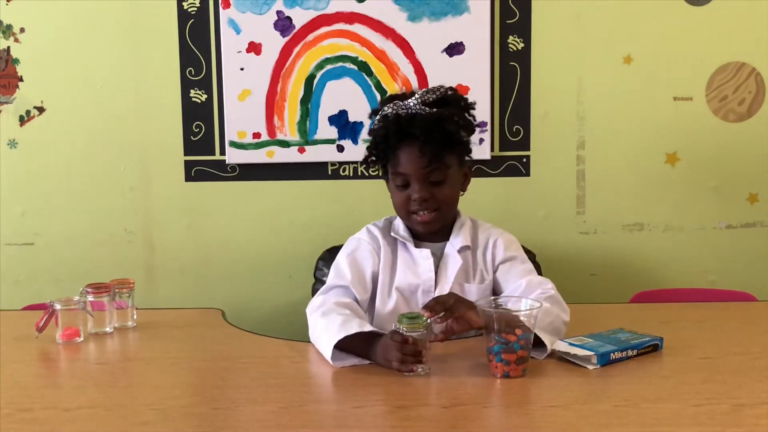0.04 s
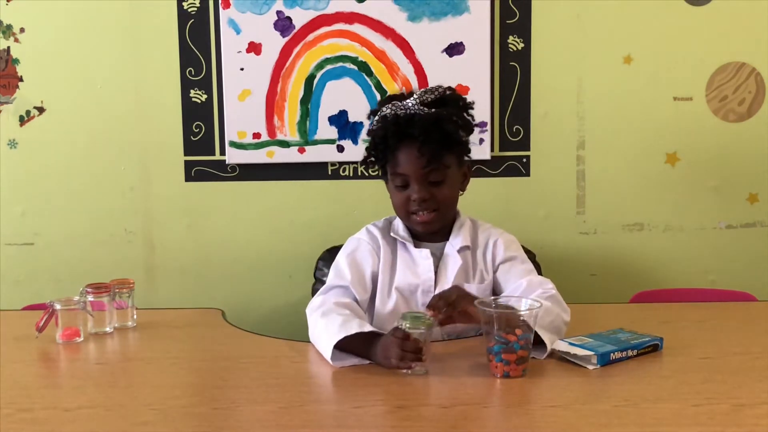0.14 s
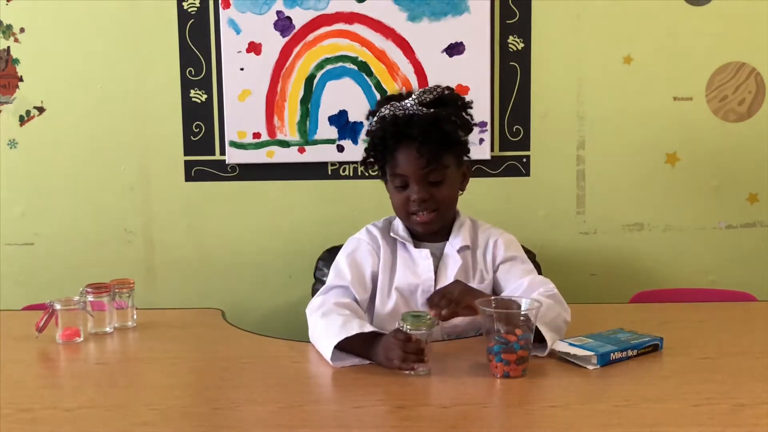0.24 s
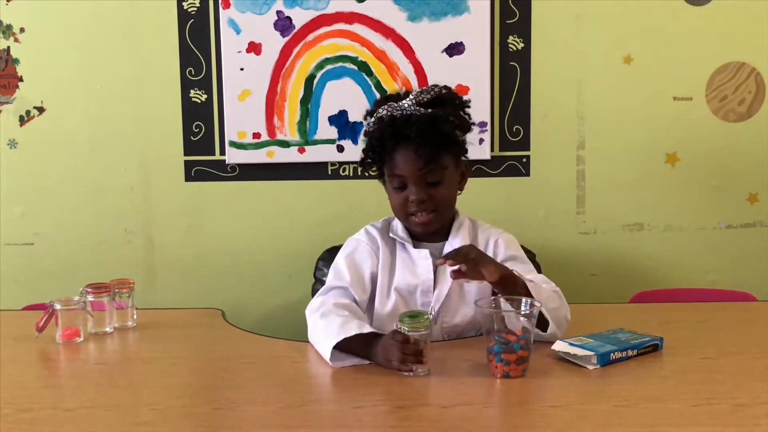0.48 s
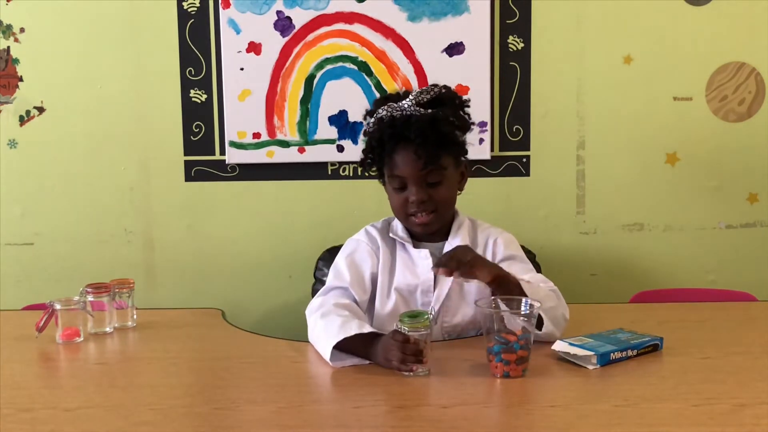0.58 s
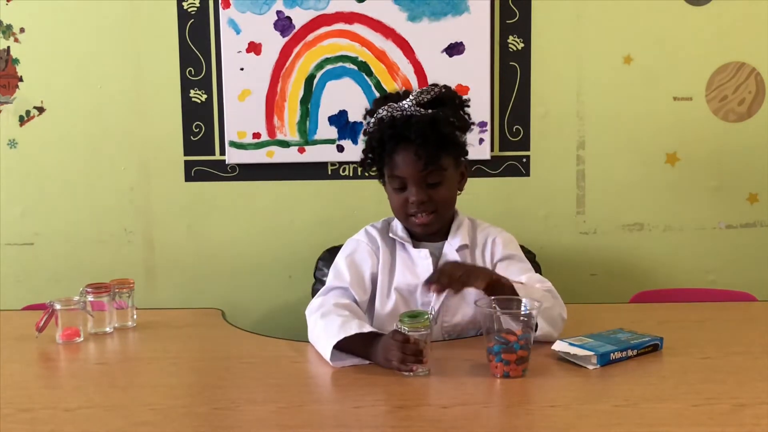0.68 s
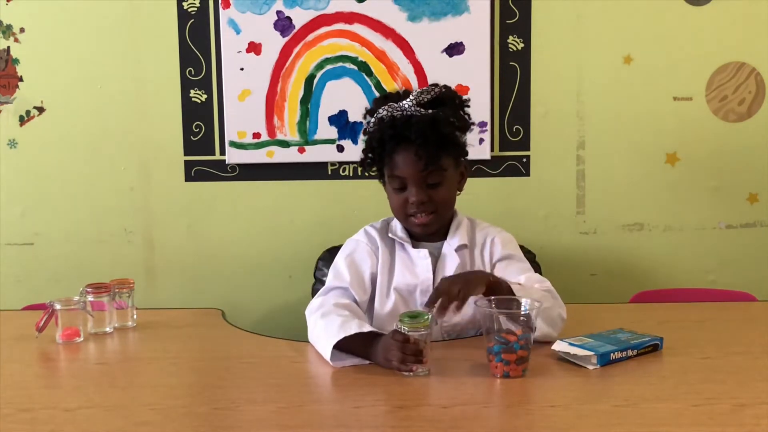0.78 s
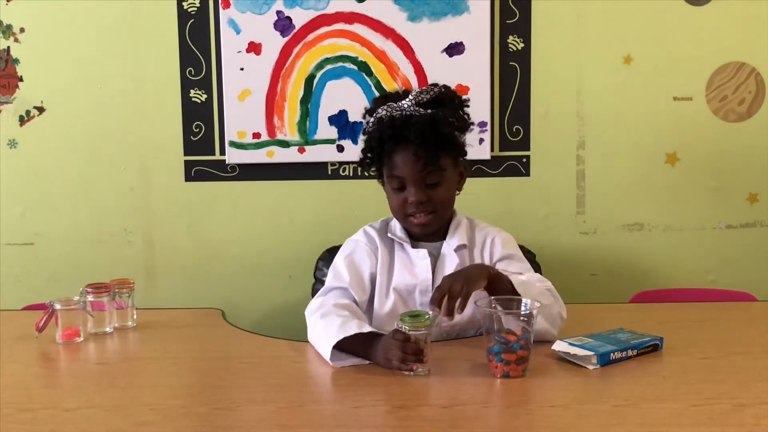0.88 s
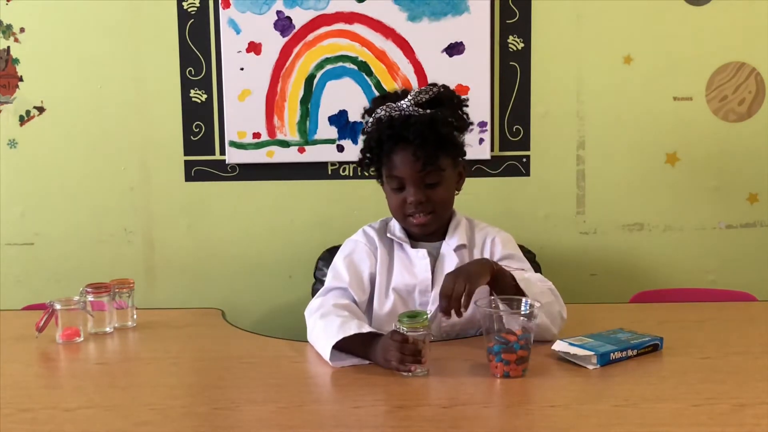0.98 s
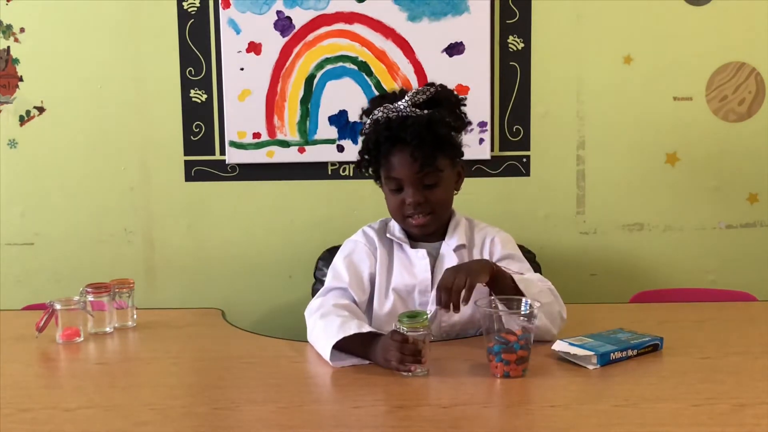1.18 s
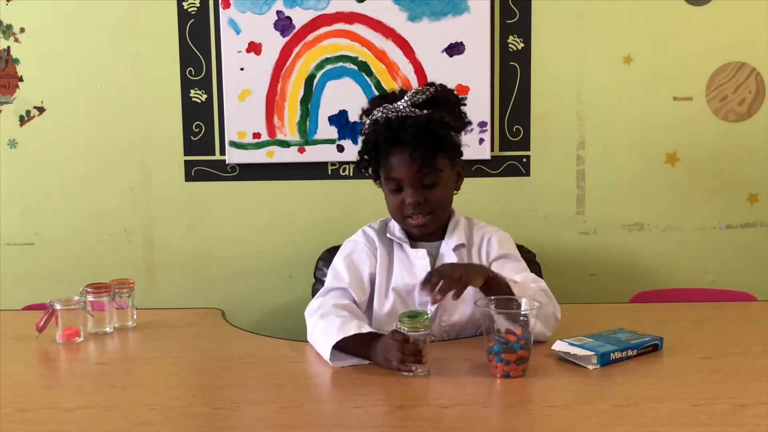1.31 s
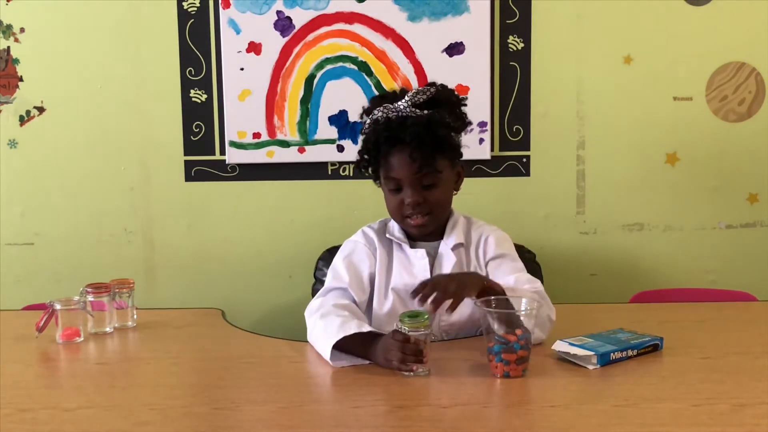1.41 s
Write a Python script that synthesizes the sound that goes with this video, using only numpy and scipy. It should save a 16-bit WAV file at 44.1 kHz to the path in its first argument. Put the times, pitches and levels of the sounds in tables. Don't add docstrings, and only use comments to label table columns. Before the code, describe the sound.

Hard candies knock loudly on a wooden table, then tick on glass and snap brightly

```python
import sys
import numpy as np
from scipy import signal
from scipy.fft import rfft, irfft, next_fast_len
from scipy.io import wavfile
from scipy.ndimage import uniform_filter1d

SR = 44100
rng = np.random.default_rng(int(sys.argv[2]) if len(sys.argv) > 2 else 0)


def to_wav(sig):
    pcm = np.clip(np.atleast_2d(sig), -1, 1) * 32767
    pcm = np.round(pcm).astype(np.int16)
    wavfile.write(sys.argv[1], SR, pcm.T)


def to_linear_factor(level_db):
    exponent = np.asarray(level_db, float) / 20
    return 10 ** exponent


N = 63945


def curve(table, hz):
    table_hz = [row[0] for row in table]
    values = [row[1] for row in table]
    return np.interp(np.log(hz), np.log(table_hz), values)


def bands():
    size = next_fast_len(N)
    hz = np.arange(size // 2 + 1) * SR / size + 1
    spectrum = rfft(rng.standard_normal(size))
    for centre in 25 * 2 ** (np.arange(29) / 3):
        triangle = np.clip(1 - 3 * np.abs(np.log2(hz / centre)), 0, 1)
        yield centre, irfft(spectrum * triangle, size)[:N]


def walk(rate):
    hold = int(SR / rate)
    steps = np.repeat(rng.standard_normal(N // hold + 1), hold)
    return uniform_filter1d(uniform_filter1d(steps, hold), hold)[:N]


def knock(blows, modes):
    scatter_db = 2.5
    out, t = np.zeros(N), np.arange(N) / SR
    modes = np.array(modes)
    hz, mode_db, t60 = modes[:, :1], modes[:, 1], modes[:, 2:]
    sign = (-1) ** np.arange(len(modes))
    chance = rng.standard_normal((len(blows), len(modes)))
    for (at, db, contact_ms), luck in zip(blows, chance):
        start = int(at * SR)
        since = np.clip(t[start:start + SR // 2] - at, 0, None)
        gain = to_linear_factor(db + mode_db + scatter_db * luck) * sign
        ring = np.sin(2 * np.pi * hz * since) * np.exp(-np.log(1000) * since / t60)
        push = np.sin(np.pi * np.clip(since[:200] * 1000 / contact_ms, 0, 1)) ** 2
        push[0] += 1e-3
        out[start:start + len(since)] += np.convolve(gain @ ring, push / push.sum())[:len(since)]
    return out


def burst(events, colour, wet_db):
    t = np.arange(N) / SR
    noise = sum(band * to_linear_factor(curve(colour, centre)) for centre, band in bands())
    envelope, strikes = np.zeros(N), np.zeros(N)
    for at, db, t60_ms in events:
        decay = to_linear_factor(db - 60000 * np.clip(t - at, 0, 1) / t60_ms)
        envelope += decay * np.clip((t - at) * 1e4 / t60_ms, 0, 1)
        strikes[int(at * SR)] = to_linear_factor(db + wet_db) * np.sqrt(t60_ms * SR / 20000)
    near = noise / np.std(noise) * envelope
    click = np.roll(irfft(to_linear_factor(curve(colour, np.arange(1025) * SR / 2048 + 1))), 1024)
    click = click / np.sqrt(np.sum(click ** 2))
    return near, signal.fftconvolve(strikes, click)[1024:1024 + N]


def ventilation():
    # frequency in Hz, level in dB per Hz
    air_colour = [(15, -42), (25, -32.5), (49, -4), (180, -8), (624, -21), (775, -21.5), (1230, -29),
                  (10400, -38), (16000, -43)]
    # frequency in Hz, level in dB
    hum_lines = [(59.2, -62.5), (177.6, -61.5), (355.3, -73.5)]
    t = np.arange(N) / SR
    air = sum(band * to_linear_factor(curve(air_colour, centre) + 0.5 * walk(27)) for centre, band in bands())
    hum = sum(to_linear_factor(db) * np.sqrt(2) * np.sin(2 * np.pi * hz * t) for hz, db in hum_lines)
    return air * to_linear_factor(-48.5) / np.std(air) + hum


def thuds(wet_db):
    # start in seconds, level in dB, t60 in ms
    thud_events = [
        (.1800, -47.5, 120),
        (0.2052, -3.5, 11),
        (0.358, -20.5, 21.6),
        (.8620, -34, 8.3),
        (0.998, -16, 6.2),
    ]
    # frequency in Hz, level in dB
    thud_colour = [(70, -19.5), (200, -8.5), (400, -10.5), (1400, -0.5), (2600, -10), (3800, -18),
                   (8000, -30), (16000, -61)]
    return burst(thud_events, thud_colour, wet_db)


def table_knock():
    # start in seconds, level in dB, contact in ms
    blows = [
        (.2048, -16, 0.76),
        (.2058, -5, 0.36),
        (.2068, -4.5, 0.52),
    ]
    # frequency in Hz, level in dB, t60 in seconds
    modes = [(265, -12.5, 0.026), (307.4, -4, 0.031), (361, -3.5, 0.086), (411, 2, 0.081),
             (510.2, 3.5, 0.078), (600.7, -2, 0.027), (719, -1, 0.079), (863, 2.5, 0.017),
             (1013, -2, 0.032), (1235.5, 4, .03), (1459, 5, 0.052), (1644, 4.5, 0.028), (2258, 8, 0.034),
             (2732, -7, .015)]
    return knock(blows, modes)


def room():
    # frequency in Hz, t60 in seconds
    room_t60 = [(100, 1.15), (300, 0.76), (1000, 0.64), (3000, 0.58), (6000, 0.47), (11000, 0.21),
                (16000, 0.37)]
    # frequency in Hz, level in dB
    room_colour = [(100, -1), (300, 7.5), (1000, -2), (3000, -6), (6000, 2.5), (16000, 6)]
    rise_s, fade_db = 0.0065, 10
    t = np.arange(N) / SR
    tail = np.zeros(N)
    for centre, band in bands():
        t60 = curve(room_t60, centre)
        tail += band * to_linear_factor(curve(room_colour, centre) - 60 * t / t60) / np.sqrt(t60)
    tail *= to_linear_factor(-fade_db * (t / 0.32) ** 2)
    tail *= 1 - np.exp(-(t / rise_s) ** 2)
    return tail / np.sqrt(np.sum(tail ** 2))


def cracks(wet_db):
    # start in seconds, level in dB, t60 in ms
    crack_events = [
        (0.2052, -17.5, 16.5),
        (.3590, -43, 6.3),
        (.3850, -63, 3.5),
        (0.396, -40.5, 5.7),
        (.8590, -52, 2.5),
        (0.868, -45, 5.9),
        (.8985, -50, 1.9),
        (.9535, -26.5, 3.2),
    ]
    # frequency in Hz, level in dB
    crack_colour = [(500, -34.5), (2000, -10.5), (4000, -4), (6000, -10.5), (8000, -8.5), (12000, 4),
                    (16000, -29.5)]
    return burst(crack_events, crack_colour, wet_db)


def candy_ticks():
    # start in seconds, level in dB, contact in ms
    blows = [
        (.2058, -11.5, 0.073),
        (.3850, -44, 0.032),
        (.8590, -45.5, .05),
        (.8660, -45, 0.16),
        (.8985, -45, 0.06),
        (.9535, -26, 0.097),
    ]
    # frequency in Hz, level in dB, t60 in seconds
    modes = [(3600, -8, .006), (5400, -6, .008), (6150, 0, .014), (9400, -8, .006), (11500, -3, .01),
             (15300, -6, .005)]
    return knock(blows, modes)


def table_board():
    # start in seconds, level in dB, contact in ms
    blows = [
        (.2090, -22.5, 3),
        (.2200, -17, 3.5),
    ]
    # frequency in Hz, level in dB, t60 in seconds
    modes = [(101, -9.5, .2), (131.3, 1.5, 0.34), (183, -6.5, 0.13)]
    return knock(blows, modes)


def bounce():
    # start in seconds, level in dB, contact in ms
    blows = [
        (.3572, -24, 0.39),
        (.3595, -27.5, 0.86),
        (.3620, -19, 0.32),
    ]
    # frequency in Hz, level in dB, t60 in seconds
    modes = [(420, -5.5, 0.039), (618, 5.5, 0.027), (1007, 10.5, 0.014), (1190, 2.5, 0.095),
             (1578, 0, 0.034), (2617, 1, 0.032)]
    return knock(blows, modes)


def glass_jar():
    # start in seconds, level in dB, contact in ms
    blows = [
        (.8575, -48, 0.078),
        (.8655, -36.5, 0.19),
        (.8980, -43, 0.075),
        (.9535, -31, .05),
        (1.0250, -23, 0.12),
    ]
    # frequency in Hz, level in dB, t60 in seconds
    modes = [(2283, -13, 0.036), (3397, -24, .02), (4080, -5.5, 0.034), (5700, -15.5, .025),
             (6790, -1, 0.052), (11200, -19.5, 0.019)]
    return knock(blows, modes)


def jar_air():
    # start in seconds, level in dB, contact in ms
    blows = [
        (.8575, -40, 0.83),
        (.8700, -35.5, 1),
        (.8800, -38, 0.85),
        (.9050, -46, 0.34),
        (.9460, -53, 0.38),
        (.9540, -37.5, 0.27),
        (.9660, -29.5, 0.96),
    ]
    # frequency in Hz, level in dB, t60 in seconds
    modes = [(524.5, 5.5, 0.052), (597, 5, 0.031), (695, 7, 0.052), (783, 9, 0.028), (1210, -7.5, 0.032)]
    return knock(blows, modes)


def plastic_cup():
    # start in seconds, level in dB, contact in ms
    blows = [
        (.9936, -22.5, 0.14),
        (.9964, -16.5, 0.21),
    ]
    # frequency in Hz, level in dB, t60 in seconds
    modes = [(230, -18, .03), (418, -5, .05), (530, -7, .04), (776, 4, .075), (1000, -11, .03),
             (1192, 5, .085), (1600, -6, .05), (2078, -14, .02), (2580, -8, .012), (3400, -14, .01)]
    return knock(blows, modes)


def snap_ring():
    # start in seconds, level in dB, contact in ms
    blows = [
        (1.0248, -18.5, .05),
        (1.0273, -15.5, 0.088),
    ]
    # frequency in Hz, level in dB, t60 in seconds
    modes = [(3200, -10, .005), (4950, -2, .012), (5400, -4, .008), (5750, 0, .013), (6100, -4, .008),
             (8700, -12, .006)]
    return knock(blows, modes)


def snap_noise(wet_db):
    # start in seconds, level in dB, t60 in ms
    snap_events = [
        (1.0249, -10.5, 4.9),
        (1.0278, -2.5, 4.9),
    ]
    # frequency in Hz, level in dB
    snap_colour = [(500, -22), (2000, -11), (4200, -5.5), (5700, 4.5), (7500, -3.5), (10000, -3),
                   (13000, -1), (16000, -5)]
    return burst(snap_events, snap_colour, wet_db)


def scene():
    wet_levels = {"table": 1, "board": -4, "bounce": -1, "cup": -3, "tick": 1, "air": 2.5, "snap": 3, "jar":
                  -9}
    crack_wet, snap_wet, thud_wet = (1, -11, 8.5)
    bodies = {"table": table_knock(), "board": table_board(), "bounce": bounce(), "cup": plastic_cup(),
              "jar": glass_jar(), "air": jar_air(), "snap": snap_ring(), "tick": candy_ticks()}
    contacts = [cracks(crack_wet), snap_noise(snap_wet), thuds(thud_wet)]
    direct = sum(bodies.values()) + sum(near for near, _ in contacts)
    send = sum(to_linear_factor(wet_levels[name]) * body for name, body in bodies.items())
    send = send + sum(click for _, click in contacts)
    echo = signal.fftconvolve(send, room())[:N]
    no_bass = signal.butter(4, 80, "high", fs=SR, output="sos")
    hits = signal.sosfilt(no_bass, direct + echo)
    return (hits + ventilation())[None]


def low_pass(x):
    return signal.sosfilt(signal.butter(12, 16790, fs=SR, output="sos"), x)


def record(dry):
    clipped = np.clip(dry, -0.97, 0.97)
    top_cut = signal.ellip(5, 0.5, 28, 15750, fs=SR, output="sos")
    mix = signal.sosfilt(top_cut, clipped)
    return low_pass(mix)


dry = scene()
out = record(dry)
to_wav(out)
```